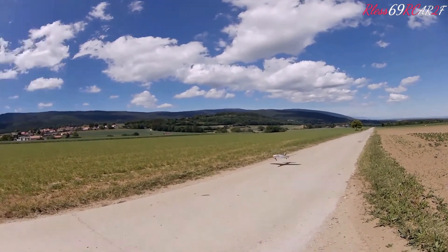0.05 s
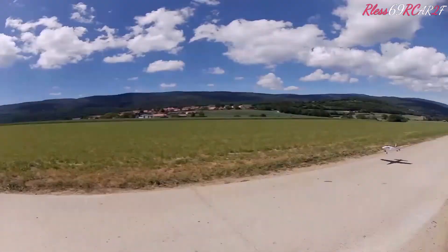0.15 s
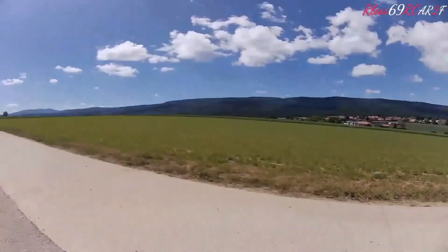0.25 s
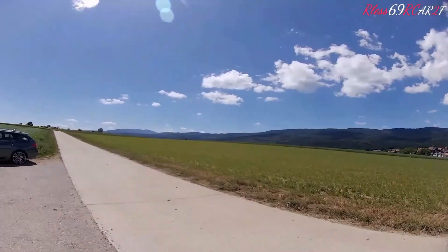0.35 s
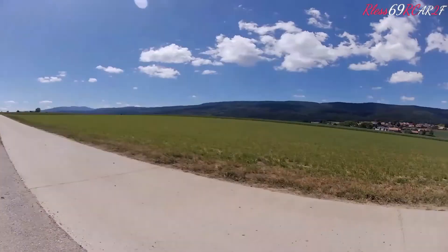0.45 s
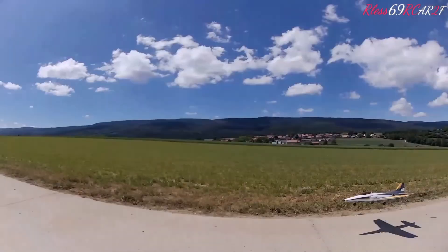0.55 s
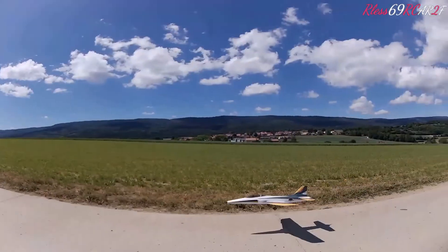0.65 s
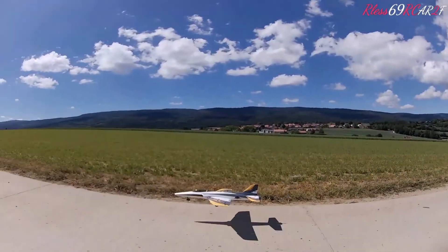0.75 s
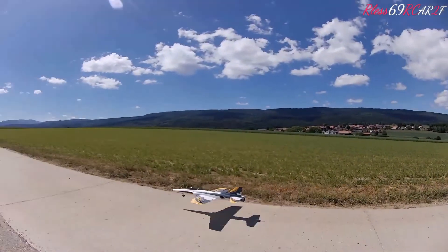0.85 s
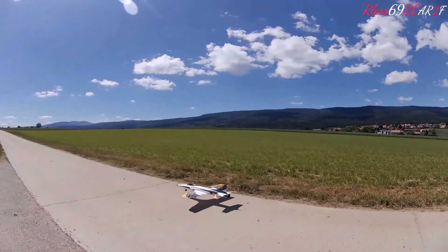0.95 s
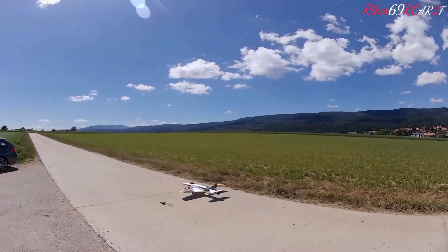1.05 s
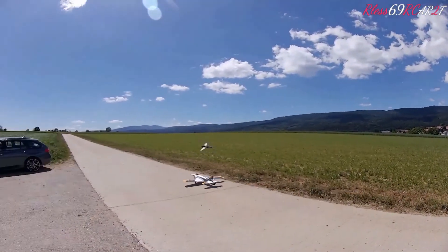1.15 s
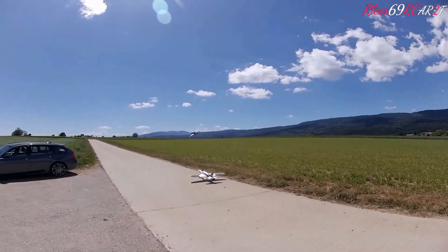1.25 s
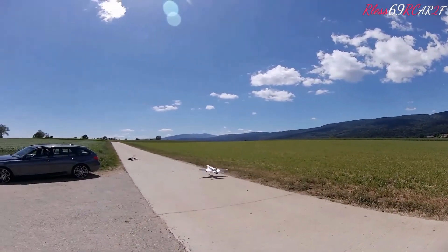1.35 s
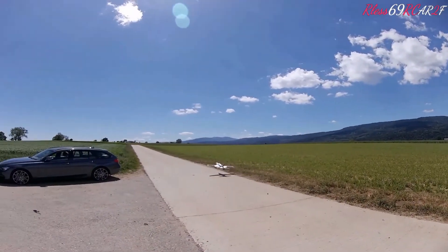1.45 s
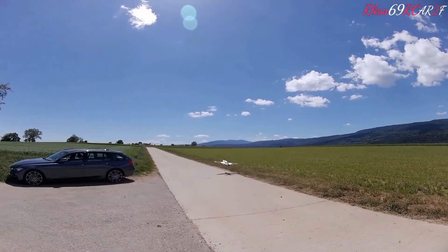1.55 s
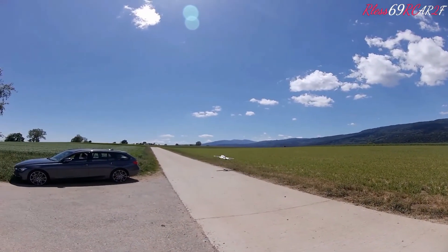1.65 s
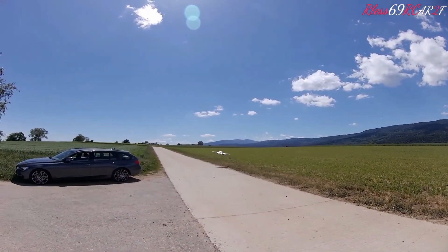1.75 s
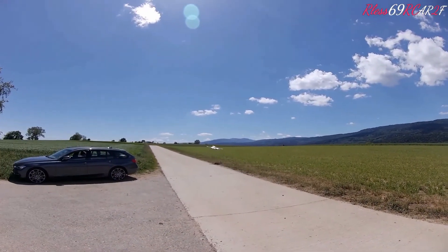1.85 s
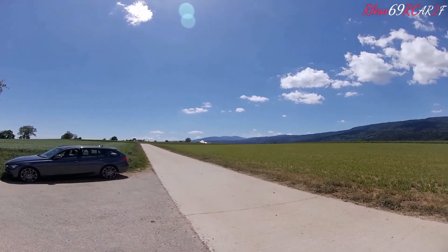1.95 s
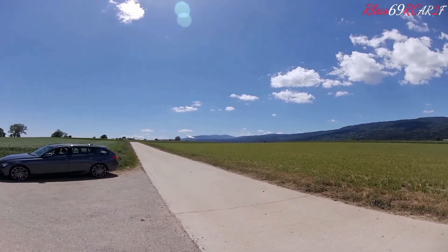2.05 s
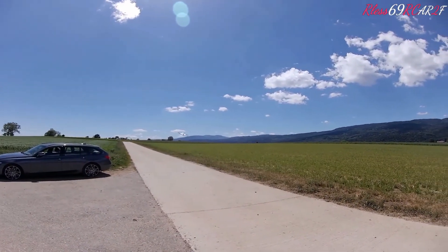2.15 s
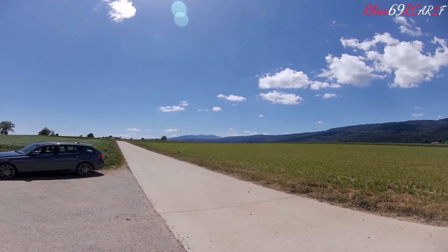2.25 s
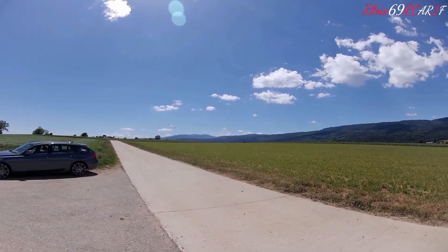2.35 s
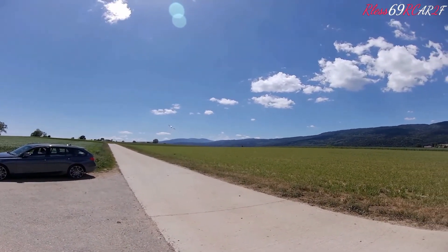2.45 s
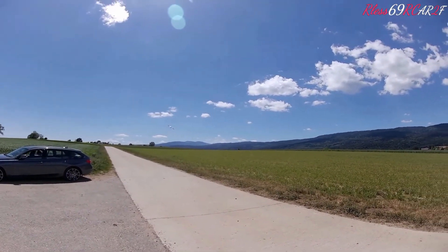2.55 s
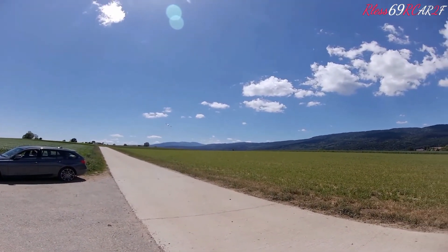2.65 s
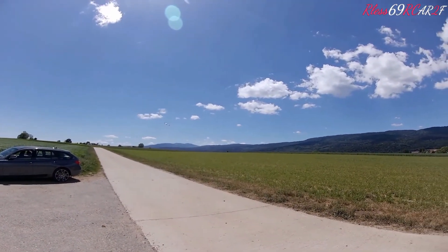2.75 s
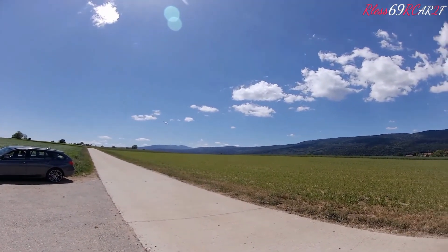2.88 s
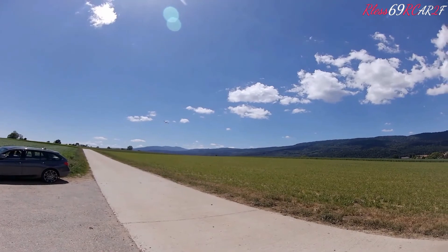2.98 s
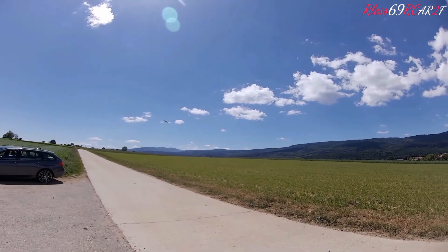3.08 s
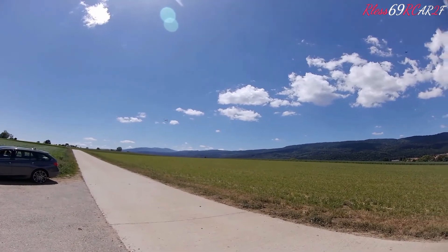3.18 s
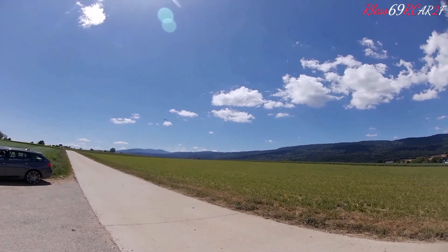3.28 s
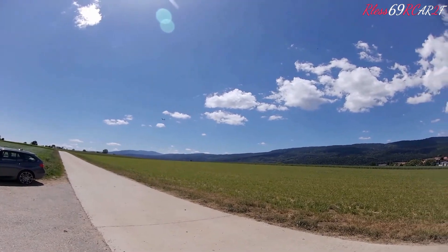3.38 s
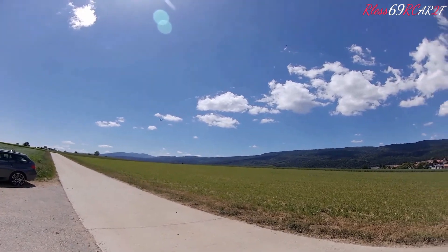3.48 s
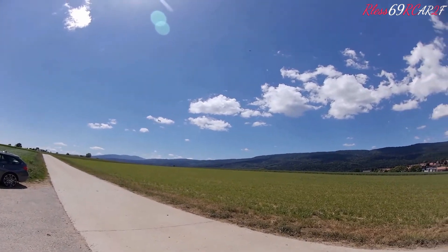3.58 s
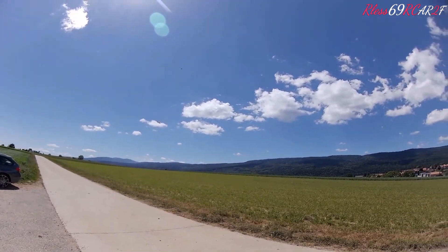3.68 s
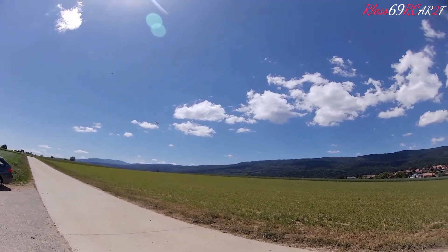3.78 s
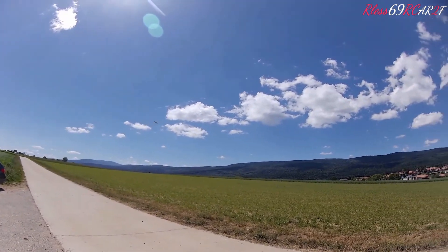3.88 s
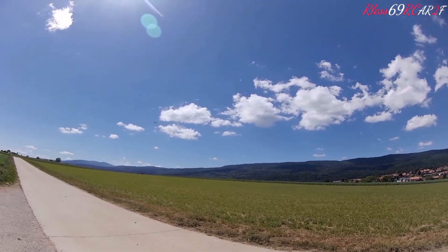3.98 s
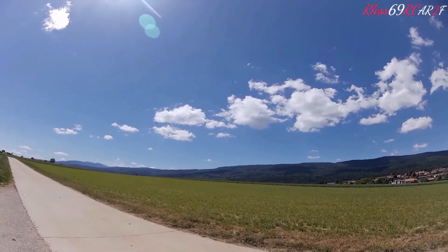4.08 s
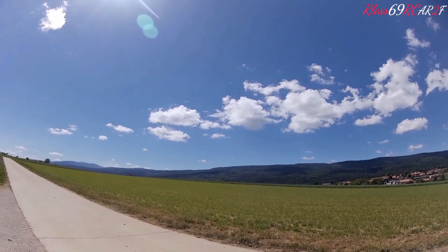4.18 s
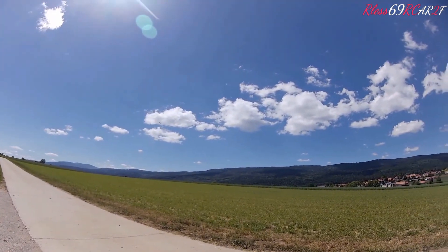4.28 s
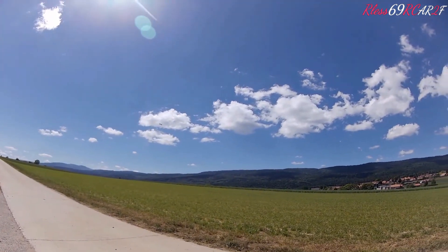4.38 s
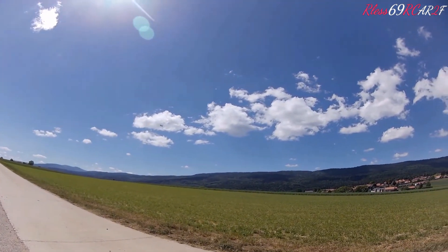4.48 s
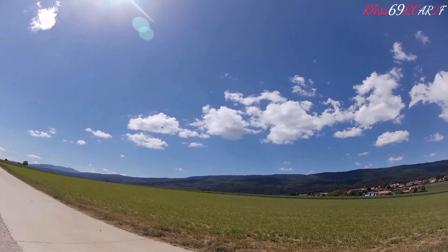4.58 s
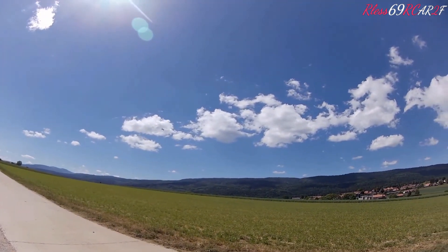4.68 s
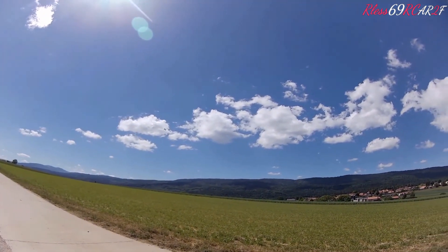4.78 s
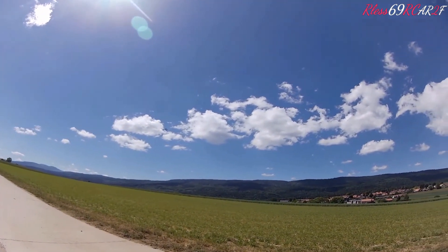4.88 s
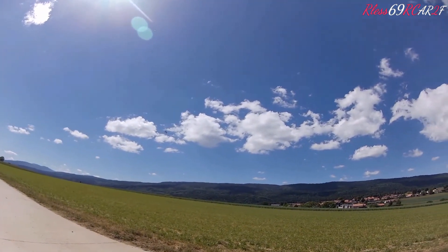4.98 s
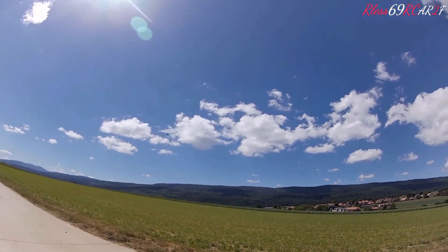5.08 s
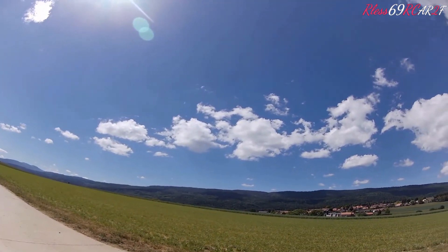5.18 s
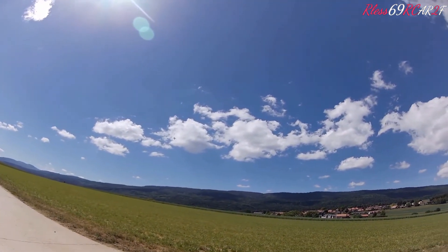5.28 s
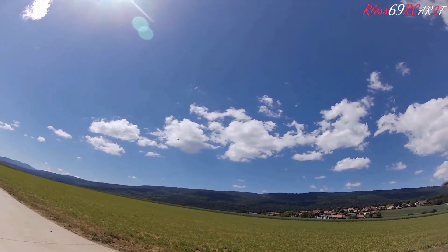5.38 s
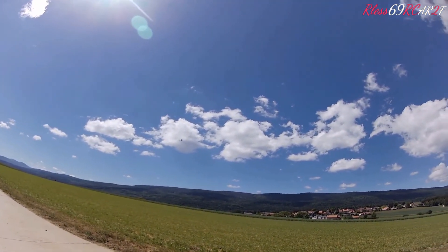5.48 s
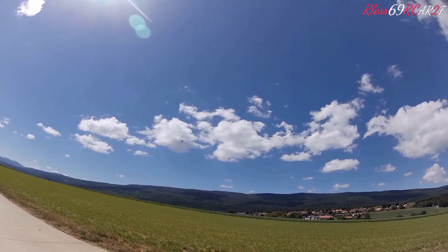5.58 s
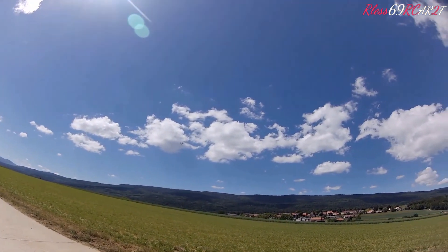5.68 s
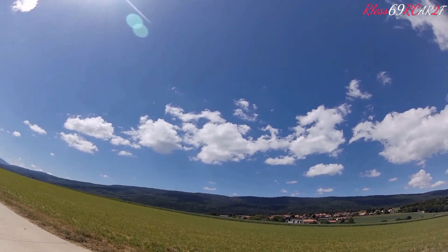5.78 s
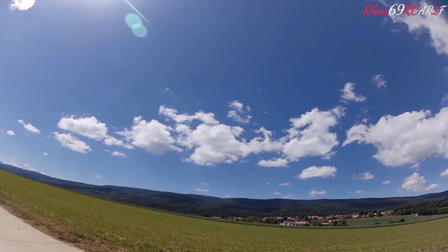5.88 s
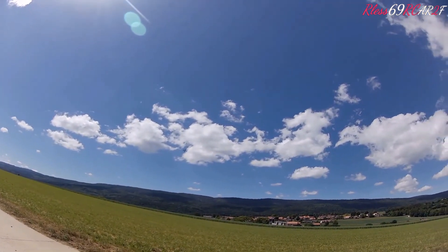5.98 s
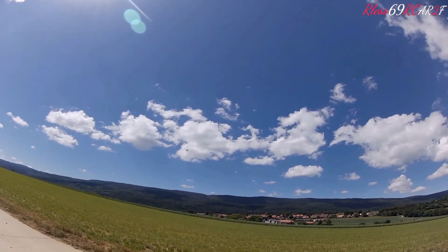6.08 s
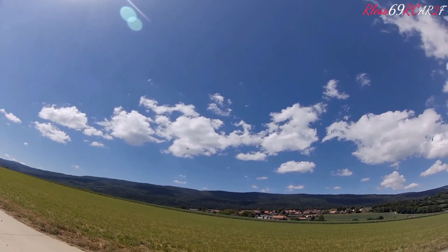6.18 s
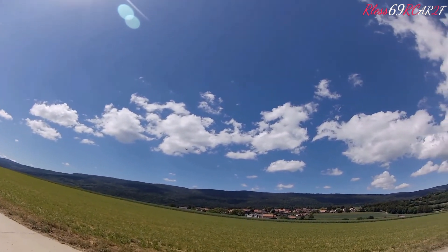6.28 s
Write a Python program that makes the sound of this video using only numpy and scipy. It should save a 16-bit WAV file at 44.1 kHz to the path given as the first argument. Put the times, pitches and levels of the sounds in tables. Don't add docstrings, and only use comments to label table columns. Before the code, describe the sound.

Handling clicks and wind buffet, then a small electric ducted-fan jet bursts past with shrill whine and rushing air, fading over fields as a cricket scrapes.

```python
import sys
import numpy as np
from scipy import signal
from scipy.fft import rfft, irfft, next_fast_len
from scipy.io import wavfile
from scipy.ndimage import uniform_filter1d, map_coordinates

SR = 44100
rng = np.random.default_rng(int(sys.argv[2]) if len(sys.argv) > 2 else 0)


def ratio(d):
    e = np.asarray(d, float) / 20
    return 10 ** e


def digitize_waveform(pressure):
    field = np.atleast_2d(pressure).T
    bounded = np.clip(field, -1, 1)
    quanta = np.round(bounded * 32767).astype(np.int16)
    wavfile.write(sys.argv[1], SR, quanta)


N = 279577

T = np.arange(N) / SR
COARSE = T[::32]
SIZE = next_fast_len(N)
HZ = np.fft.rfftfreq(SIZE, 1 / SR)
EDGE_HZ = 14600
# time in seconds, level in dB.
RUSH = [(.55, -59.5), (.79, -44), (.9, -35.5), (1.11, -31), (1.18, -31), (1.43, -35.5), (1.6, -41),
        (2.1, -44), (2.42, -47), (2.5, -49.5), (2.77, -53), (3.2, -49.5), (3.69, -62), (3.8, -57.5),
        (4.75, -70.5), (5.43, -57.5), (5.52, -67), (6.34, -65)]


def evened(x):
    return x / np.sqrt(np.mean(x ** 2) + 1e-20)


def read(points, hz):
    f, value = np.transpose(points)
    return np.interp(np.log(hz + 1), np.log(f + 1), value)


def curves(rows):
    s, *columns = np.transpose(rows)
    return [np.interp(T, s, c) for c in columns]


def bell(s, half, clock=T):
    return np.exp(-((clock - s) / half) ** 2)


def swells(rows):
    return np.interp(T, COARSE, sum(ratio(db) * bell(s, half, COARSE) for s, half, db in rows))


def coloured(x, points):
    return irfft(rfft(x, SIZE) * ratio(read(points, HZ)), SIZE)[:N]


def drift(hz):
    f = np.fft.rfftfreq(len(COARSE), COARSE[1])
    spectrum = rfft(rng.standard_normal(len(COARSE))) / (1 + (f / hz) ** 4)
    return np.interp(T, COARSE, evened(irfft(spectrum, len(COARSE))))


def noise(points, patchy_db):
    frames = N // 128 + 5
    a, b, patches = rng.standard_normal((frames, 257, 3)).T
    patches = evened(uniform_filter1d(uniform_filter1d(patches, 6, 0), 24, 1))
    z = (a + 1j * b) * ratio(patchy_db * patches)
    plain = signal.istft(z, nperseg=512, noverlap=384)[1][:N]
    return evened(coloured(plain, points))


def band(x, lo_hz, hi_hz):
    return signal.sosfilt(signal.butter(3, [lo_hz, hi_hz], "bandpass", fs=SR, output="sos"), x)


def add(mix, s, sound):
    part = mix[round(s * SR):][:len(sound)]
    part += sound[:len(part)]


def pitch():
    # time in seconds, blade-pass pitch the motor heads for in Hz, lag in seconds.
    throttle = [
        (0.423, 7299, 0.1174),
        (3.02, 6934, 0.0344),
        (3.343, 6041, 0.0331),
        (3.545, 5816, 0.0222),
        (3.74, 5667, 0.017),
        (4.408, 6080, 0.0135),
        (4.701, 7312, 0.0461),
    ]
    # time in
    # seconds, bend as the equal speed away from the listener in m/s.
    bend_rows = [(.68, -31), (.75, -17), (.85, -15), (.9, -23), (1.04, -19), (1.3, 10.5), (1.5, 17.5), (1.8, 23),
                 (3, 29.9), (5.3, 24.2), (6.34, 14)]
    s, hz, lag = np.transpose(throttle)[:, :, None]
    u = np.maximum(COARSE - s, 0) / lag
    steps = np.diff(hz, axis=0, prepend=0)
    spin = (steps * (1 - (1 + u + u * u / 2) * np.exp(-u))).sum(0)
    return np.interp(T, COARSE, spin) / (1 + curves(bend_rows)[0] / 343)


def whine():
    blades = 10
    # time in seconds, blade tone in dB, twice blade tone in dB, shaft tone in dB.
    beam = [(.68, -52, -69, -69), (.74, -53.5, -70, -62), (.79, -48.5, -64, -52), (.85, -53.5, -51, -49),
            (.92, -34, -45, -47.5), (1.16, -43.5, -38, -41.5), (1.27, -48, -34, -42.5),
            (1.36, -47, -41, -48.5), (1.5, -58, -58, -51.5), (1.8, -56, -56, -66.5), (2.62, -63, -80, -71),
            (2.76, -52, -80, -70), (3.04, -45.5, -78, -63.5), (3.2, -48.5, -73, -59),
            (3.4, -55.5, -61.5, -63), (4.3, -57, -62, -77), (4.7, -70, -72, -62), (4.88, -53, -60, -54.5),
            (5.14, -49, -68, -62), (5.44, -49.5, -89, -65.5), (5.56, -68.5, -74, -67),
            (6.34, -67, -69, -71)]
    # time in seconds, half length in seconds, gain in dB.
    fades = [(0.827, 0.015, -11), (1.252, 0.038, -17), (4.827, 0.046, -13), (4.922, 0.0054, -19),
             (5.067, 0.036, -12)]
    # shaft multiple, dB against the sixth order.
    weak_orders = [(2, -13.5), (4, 1.5)]
    # shaft multiple, dB against the twice blade tone.
    side_tones = [(10.45, -33), (11, -42)]
    # shaft multiple, peak in seconds, half length in seconds, dB.
    spool = [(9, .79, .025, -51), (7, .875, .02, -47), (2, .92, .09, -51), (3, .72, .04, -59),
             (1.5, .79, .04, -50), (6, 4.93, .06, -67), (4, 5.12, .13, -64), (2, 5.3, .25, -66),
             (6, 5.2, .1, -64), (6, 5.95, .2, -67)]
    blade_db, twice_db, shaft_db = curves(beam)
    hz = pitch()
    blade_db = blade_db + sum(db * bell(s, half) for s, half, db in fades)

    twice_db = twice_db - 8 * np.maximum(2 * hz - 11800, 0) / 1000 * (T > 4.5)

    ring_db = 8.5 / (1 + ((6 * hz / blades - 4440) / 570) ** 2)
    turned_db = -1.5 * (T > 5.1)
    sixth_db = curves(RUSH)[0] - 23 + ring_db + turned_db

    turns = np.cumsum(hz * (1 + 0.0009 * drift(hz=59.6))) / SR / blades
    # shaft multiple, level in dB, twinkle in dB
    orders = [
        (blades, blade_db, 2.2),
        (2 * blades, twice_db, 2.5 + 1.1 * (T > 2.4)),
        (14, twice_db - 17 - 12 * np.maximum(T - 2.4, 0), 3.),
        (1, shaft_db, 1.5),
        (6, sixth_db - 5.0, 2.8)]
    orders += [(k, np.minimum(sixth_db, -57) + db - 9 * (T > 5.52), 2.) for k, db in weak_orders]
    orders += [(k, twice_db + db - 9 * np.maximum(T - 1.5, 0), 4.) for k, db in side_tones]
    orders += [(k, db - 9 * ((T - s) / half) ** 2, 4.5) for k, s, half, db in spool]
    out = np.zeros(N)
    for k, db, twinkle_db in orders:
        out += ratio(db + twinkle_db * drift(hz=27.4)) * np.sin(2 * np.pi * k * turns)
    return np.sqrt(2) * out * np.clip((T - beam[0][0]) / .015, 0, 1)


def rush():
    # frequency in Hz, density in dB per Hz.
    near = [(180, -15), (300, -12.5), (763, -6.5), (1270, 5.5), (1400, -5), (1850, -0.5), (2650, -4),
            (3250, -6.5), (4050, -3), (5010, -9), (6510, -11), (6950, -8.5), (8190, -11), (14000, -14),
            (15000, -26)]
    # time in seconds, lag of the ground echo in ms.
    ground = [(.6, 0.39), (.8, 0.31), (.95, 0.25), (1.48, 0.26), (1.65, 0.46), (2.05, .76), (2.4, 1.16),
              (2.75, 1.61), (3.25, 1.94), (4.15, 2.66), (6.34, 4.36)]
    # time in seconds, half length in seconds, gain in dB.
    puffs = [(1.09, 0.02, 0), (4.288, 0.049, 7.5), (4.873, 0.15, 8.5), (6.05, 0.074, 5)]
    level_db = curves(RUSH)[0] + sum(db * bell(s, half) for s, half, db in puffs)

    astern_s = 0.99
    ahead_db = -3 * np.clip((astern_s - T) / 0.048, 0, 1)
    treble_db = 1.5 + ahead_db - 1.5 * np.maximum(T - astern_s, 0)

    air = noise(near, patchy_db=1.3)
    air = air / band(air, 2100, 4800).std()
    low = signal.sosfiltfilt(signal.butter(2, 6500, fs=SR, output="sos"), air)
    high = (air - low) / band(air, 7300, 10000).std()
    direct = low + ratio(treble_db) * high

    road = 0.17 * np.clip((1.6 - T) / 0.11, 0, 1)
    share = np.clip(0.57 + road + 0.12 * drift(hz=9.2), 0, 1)
    lag_ms = curves(ground)[0]
    echo = map_coordinates(low, [np.arange(N) - lag_ms * SR / 1000], order=3)
    both = (direct + share * echo) / np.sqrt(1 + share ** 2)
    start = np.clip((T - RUSH[0][0]) / 0.01, 0, 1)
    return both * ratio(level_db - 6.0 + 0.9 * drift(hz=12)) * start


def gusts():
    # peak in seconds, buffet in dB, rise in dB/s, fall in dB/s, whistle over the port in dB above it.
    gust_rows = [(0, -43, 104, 87, 1.5), (0.267, -28, 145, 98, -12.5), (0.328, -26, 95, 400, -14),
                 (.5, -39.5, 4, 154, -11.5), (.69, -38, 145, 133, -6), (0.818, -34.5, 178, 52, -6.5),
                 (.88, -39, 100, 200, -5), (.93, -33.5, 84, 300, -14), (1.025, -35.5, 300, 82, -14.5),
                 (1.3, -44.5, 31, 58, -16.5), (1.7, -44, 82, 30, -15), (1.92, -36.5, 33, 46, -16),
                 (2.56, -46.5, 12, 39, -16.5), (2.818, -39, 400, 188, -14), (3.2, -47.5, 25, 47, -16),
                 (3.388, -35.5, 900, 49, -16), (3.49, -36, 69, 260, -26), (3.711, -33.5, 219, 38, -21),
                 (3.86, -32.5, 56, 73, -15.5), (3.99, -35, 40, 400, -21), (4.05, -42.5, 200, 110, -18.5),
                 (4.15, -41.5, 60, 40, -22.5), (4.27, -35, 90, 26, -17), (4.47, -33.5, 19, 50, -19.5),
                 (4.79, -43, 40, 36, -38), (5.822, -38.5, 283, 34, -20), (6, -42, 109, 290, -23),
                 (6.33, -60, 200, 104, -27)]
    # from in seconds, to in seconds, rate in dB/s.
    lulls = [(0.605, 0.635, 116), (3.24, 3.385, 200), (3.505, 3.656, 202), (4.856, 5.73, 300),
             (6.004, 6.328, 148)]
    calm_db, return_db_per_s = -66.5, 500
    s, db, rise, fall, port_db = np.transpose(gust_rows)[:, :, None]
    each = db - np.where(COARSE < s, abs(rise) * (s - COARSE), abs(fall) * (COARSE - s))
    lull = 0
    for start, end, rate in lulls:
        dip = np.minimum(rate * (COARSE - start), return_db_per_s * (end - COARSE))
        lull = lull + np.maximum(dip, 0)
    port_db = uniform_filter1d(port_db[each.argmax(0), 0], size=47)
    buffet_db = np.maximum(each.max(0) - lull, calm_db)
    return np.interp(T, COARSE, buffet_db), np.interp(T, COARSE, port_db)


def wind():
    # frequency in Hz, density in dB per Hz.
    buffet_points = [(44, -17), (75, 3.5), (162, 2), (239, -3.5), (311, -14.5), (469, -27), (500, -54),
                     (650, -69), (1100, -120)]
    # frequency in Hz, density in dB per Hz.
    port_points = [(180, -20), (300, -4), (632, -14), (722, -14.5), (1230, -16.5), (1320, -24), (2500, -38),
                   (3250, -28), (5500, -120)]
    # peak in seconds, half length in seconds, level in dB.
    swings = [(.08, 0.1, -54.5), (.32, 0.12, -40), (.5, 0.073, -40), (.69, 0.034, -48), (1, 0.12, -38),
              (1.25, 0.23, -48), (1.9, 0.28, -42.5), (2.6, 0.75, -48.5), (3.42, 0.051, -47),
              (3.8, 0.17, -40), (4.29, 0.091, -44), (4.5, 0.086, -53), (5.9, 0.13, -60), (6.2, 0.36, -54.5)]
    buffet_db, port_db = gusts()
    lumps = drift(hz=34.6)
    buffet = noise(buffet_points, patchy_db=2.5)
    buffet = buffet / (uniform_filter1d(buffet ** 2, size=1800) + .05) ** 0.25
    buffet = evened(buffet * ratio(0.64 * lumps))
    rasp = noise(port_points, patchy_db=1.1) * ratio(2.95 * lumps + 1.0 * drift(hz=68))
    rasp = rasp / band(rasp, 330, 620).std()
    still_db = -67.5
    rumble = (ratio(still_db) + swells(swings)) * evened(band(rng.standard_normal(N), 18.7, 81.0))
    return rumble + ratio(buffet_db) * (buffet + ratio(np.minimum(port_db, -2) + 1.5) * rasp)


def handling():
    # peak in seconds, half length in seconds, level in dB.
    rub = [(0.119, 0.022, -53), (0.228, 0.034, -46.5), (.335, 0.047, -53), (0.389, 0.033, -41),
           (0.542, 0.013, -47), (0.598, 0.066, -45.5)]
    # frequency in Hz, density in dB per Hz.
    rubbed = [(1200, -6), (2600, -12), (3900, -6), (5000, -9), (7500, -6.5), (9100, -8), (13000, -6.5),
              (15000, -4)]
    # start in seconds, peak in dB, ring in Hz.
    ticks = [(0.167, -44, 7600), (0.179, -34, 8100), (0.2145, -15, 4100), (0.237, -29.5, 7560),
             (0.3105, -40, 3620), (0.331, -39, 3750), (0.398, -44, 4100), (.5357, -37, 3850),
             (0.557, -28, 6460), (0.6322, -16.5, 5440), (0.667, -39, 3720)]
    # start in seconds, peak in dB, ring in Hz, decay by 60 dB in seconds.
    knocks = [(0.25, -20, 970, 0.016), (0.295, -22.5, 726, 0.011), (0.38, -36, 673, 0.011),
              (0.415, -25.5, 770, 0.0062), (0.557, -7.5, 1416, 0.0084), (0.557, -15, 537, 0.0061),
              (0.636, -22, 760, 0.0063), (1.166, -14.5, 690, 0.0026), (1.349, -25, 1020, 0.012),
              (1.989, -23.5, 1040, 0.0064), (2.824, -40, 1250, 0.012), (3.385, -47, 622, 0.009),
              (3.883, -21, 630, 0.0028), (3.955, -34, 600, 0.015), (4.346, -32, 750, 0.011),
              (4.441, -39, 1100, 0.0098), (4.9, -29, 700, 0.0042), (5.716, -33, 810, 0.0066),
              (6.13, -29.5, 855, 0.0033)]
    hold_db, let_go_s = -57, .76
    skin = noise(rubbed, patchy_db=1.5) * ratio(3.5 * drift(hz=150))
    grip = np.clip((let_go_s - T) / 0.069, 0, 1)
    out = evened(skin) * (ratio(hold_db) + swells(rub)) * grip
    t = np.arange(1200) / SR
    cracks = rng.standard_normal((len(ticks), len(t)))
    for (s, db, hz), crack in zip(ticks, cracks):
        snap = band(crack * ratio(-60 * t / .006), 3000, 17000)
        burst = band(snap, 3200, 8200) + .5 * snap
        burst = burst + .2 * np.sin(2 * np.pi * hz * t) * ratio(-60 * t / .008)
        add(out, s, ratio(db) * burst / abs(burst).max())
    for s, db, hz, t60 in knocks:
        ring = np.sin(2 * np.pi * hz * t) + .5 * np.sin(2 * np.pi * 0.653 * hz * t)
        onset = 1 - np.exp(-t / .0003)
        add(out, s, -ratio(db - 1 - 60 * t / max(t60, .003)) * ring * onset)
    return out


def lid():
    # peak in seconds, half length in seconds, level in dB, ring in Hz.
    flutters = [(0.018, 0.019, -39, 835), (0.55, 0.039, -48.5, 880), (1.174, 0.025, -33.5, 605),
                (5.768, 0.015, -47, 700), (5.797, 0.01, -38, 760)]
    out = np.zeros(N)
    shake = rng.standard_normal(N)
    for s, half, db, hz in flutters:
        near = slice(max(round((s - 3 * half) * SR), 0), round((s + 3 * half) * SR))
        ring = evened(band(shake[near], 0.57 * hz, 1.23 * hz))
        out[near] += ratio(db) * ring * bell(s, half, T[near])
    return out


def cricket():
    # start in seconds, peak in dB.
    chirps = [(2.4698, -53), (2.6184, -53), (2.7412, -54), (2.8384, -54), (2.9587, -59), (3.021, -56),
              (3.1532, -56), (3.1976, -60), (3.264, -62), (3.3373, -59), (3.4436, -58), (3.492, -56),
              (3.5533, -54), (3.6735, -49), (3.7733, -53), (3.8761, -56), (3.9943, -54), (4.0931, -50),
              (4.2034, -55), (4.2762, -49), (4.4044, -55), (4.4937, -49), (4.5905, -53), (4.7421, -56),
              (4.8064, -50), (4.8763, -51), (4.8974, -53), (4.9242, -49), (4.9394, -50), (4.9935, -53),
              (5.026, -49), (5.1597, -50), (5.272, -51), (5.4106, -52), (5.5313, -52), (5.6595, -50),
              (5.7014, -58), (5.7754, -60), (5.8471, -53), (5.9025, -60), (5.9539, -55)]
    t = np.arange(1100) / SR
    scrapes = rng.standard_normal((len(chirps), len(t)))
    stroke = np.sin(np.pi * (t / t[-1]) ** 0.59) ** 2
    out = np.zeros(N)
    for (s, db), scrape in zip(chirps, scrapes):
        wing = evened(band(scrape, 11900, 13900))
        add(out, s, ratio(db - 12.0) * wing * stroke)
    return out


def open_field():
    # frequency in Hz, density in dB per Hz.
    field_points = [(30, -40), (60, -5), (550, -6), (1250, -6.5), (1500, -10), (2300, -15), (4000, -12),
                    (5600, -11.5), (9000, -13), (12800, -18.5), (15000, -27)]
    return ratio(-60.5) * noise(field_points, patchy_db=1.2)


def scene():
    mid = whine() + rush() + wind() + handling() + lid() + cricket() + open_field()
    return np.array([mid, mid])


def thin_patches(x, slips):
    z = signal.stft(x, nperseg=1024)[2]
    power = abs(z) ** 2
    here = uniform_filter1d(uniform_filter1d(power, size=5, axis=0), size=3, axis=1)
    around = np.exp(uniform_filter1d(np.log(power + 1e-16), size=40, axis=0))
    kept = np.where(here < around * ratio(-8.5), .05, 1)
    hz = np.fft.rfftfreq(1024, 1 / SR)[:, None]
    s = np.arange(z.shape[1]) * 512 / SR
    ragged_hz = 330 * np.minimum(slips[:len(s)] + .6, 3.2) * (s > 2.35)
    kept = kept * (hz < EDGE_HZ + 200 - ragged_hz)
    kept[:38] = 1
    return signal.istft(z * kept, nperseg=1024)[1][:N]


def low_pass(x):
    return signal.sosfilt(signal.butter(12, 15850, fs=SR, output="sos"), x)


def record(dry):
    # frequency in Hz, width in Hz, gain in dB.
    case = [
        (1830, 140, -5),
        (4980, 180, -6.5),
        (2950, 200, -4),
        (9050, 220, -8),
        (4180, 260, 4.5),
        (11000, 150, -4),
    ]
    # frequency in Hz, side against mid in dB.
    spread = [(60, -31), (110, -33.5), (200, -33), (380, -27), (700, -17), (1290, -16), (2380, -11),
              (4400, -8), (8120, -4), (15000, 1)]
    case_db = sum(db / (1 + ((HZ - hz) / width) ** 2) for hz, width, db in case)
    top_db = -55 * np.clip((HZ - EDGE_HZ) / 200, 0, 1)
    spectrum = rfft(dry.mean(0), SIZE) * ratio(case_db + top_db)
    mid = irfft(spectrum, SIZE)[:N]
    lead = irfft(-1j * spectrum, SIZE)[:N]
    slips = np.repeat(rng.exponential(1, N // 1536 + 3), 3)
    mid, lead = thin_patches(mid, slips), thin_patches(lead, slips)
    z = signal.stft(mid, nperseg=256)[2]
    scatter = np.exp(2j * np.pi * rng.random(z.shape[::-1]).T)
    stray = signal.istft(z * scatter, nperseg=256)[1][:N]
    side = coloured(0.34 * lead + 0.54 * stray, spread)
    return low_pass(np.array([mid + side, mid - side]))


dry = scene()
out = record(dry)
digitize_waveform(out)
```